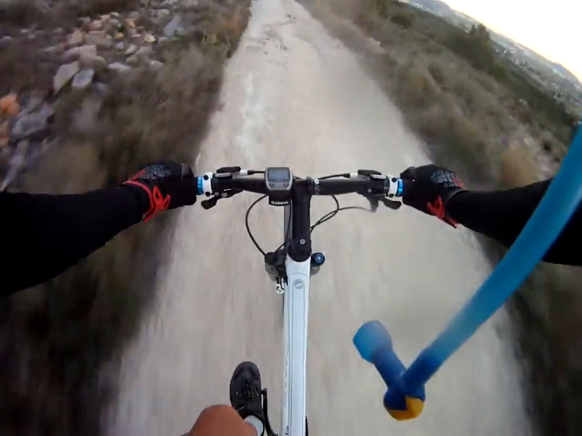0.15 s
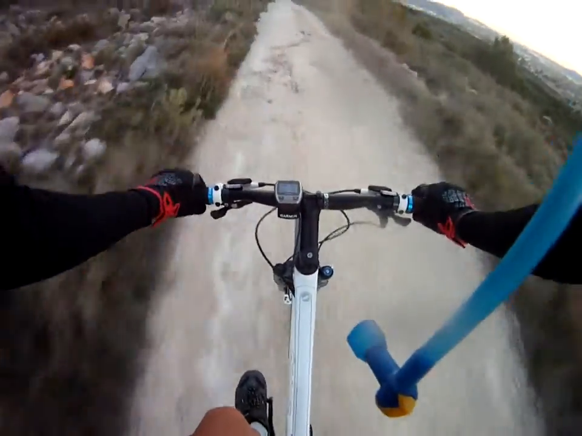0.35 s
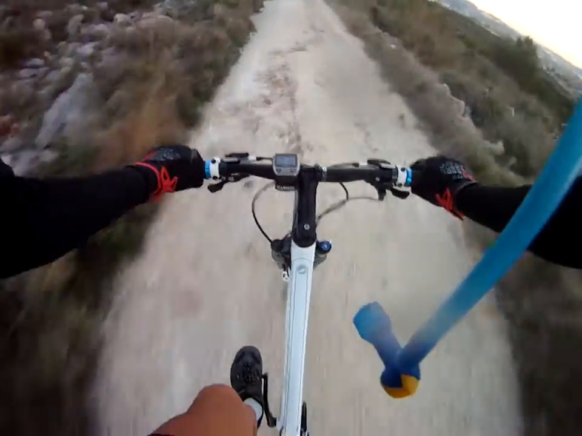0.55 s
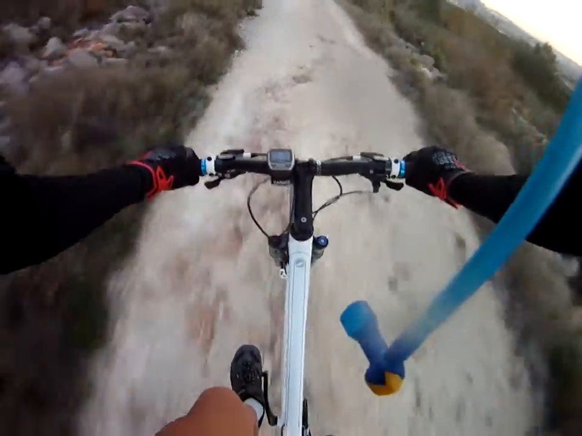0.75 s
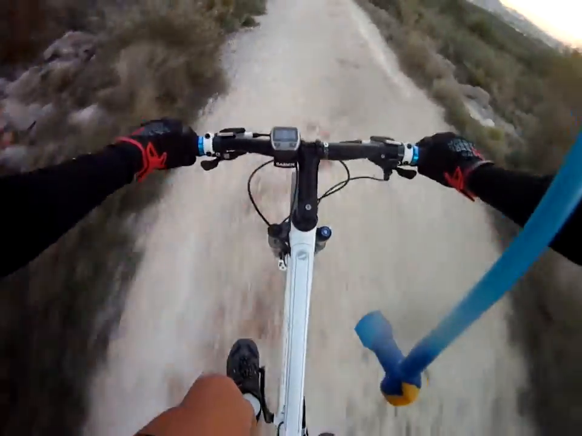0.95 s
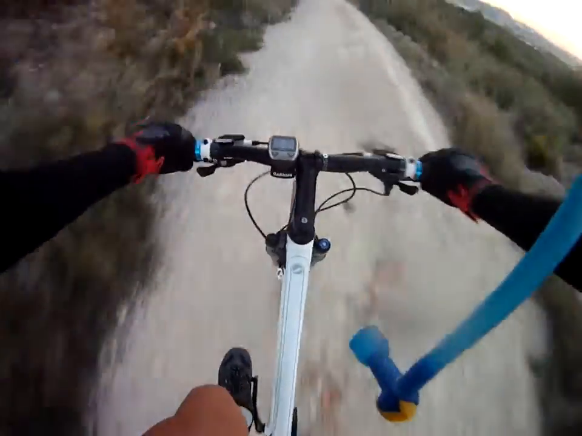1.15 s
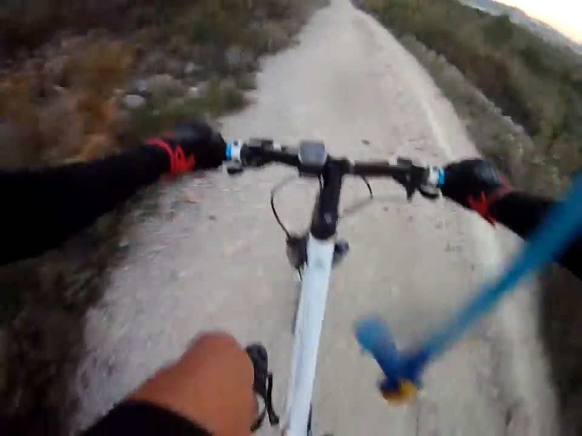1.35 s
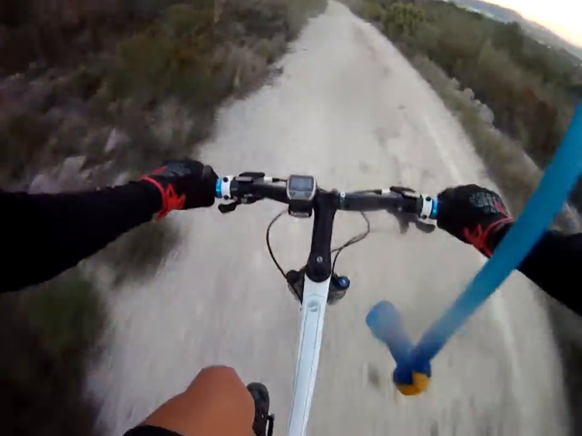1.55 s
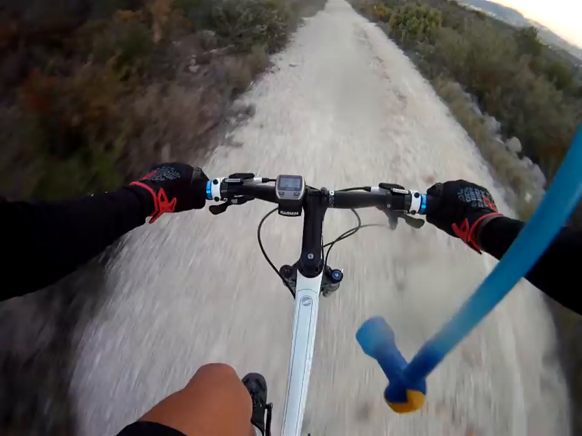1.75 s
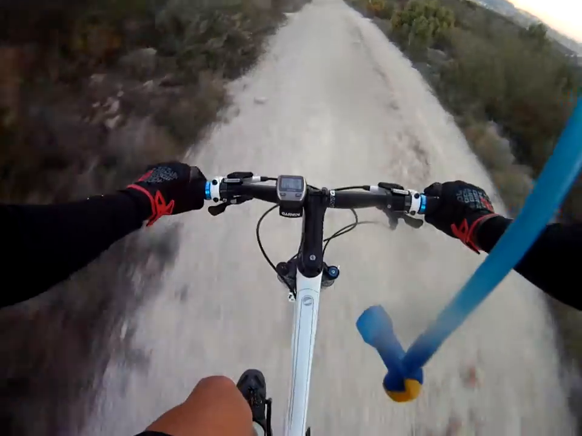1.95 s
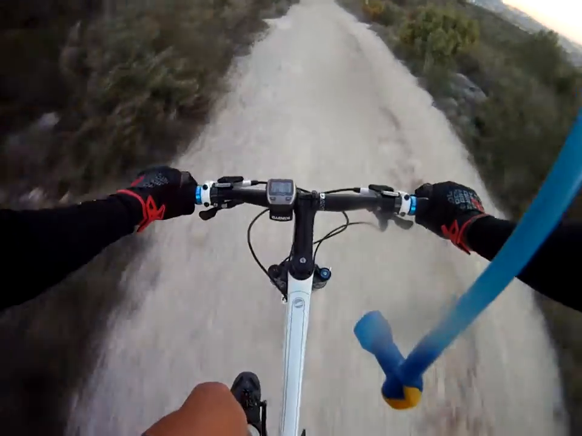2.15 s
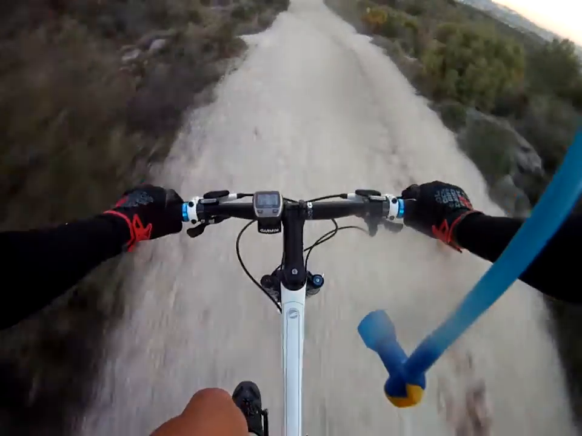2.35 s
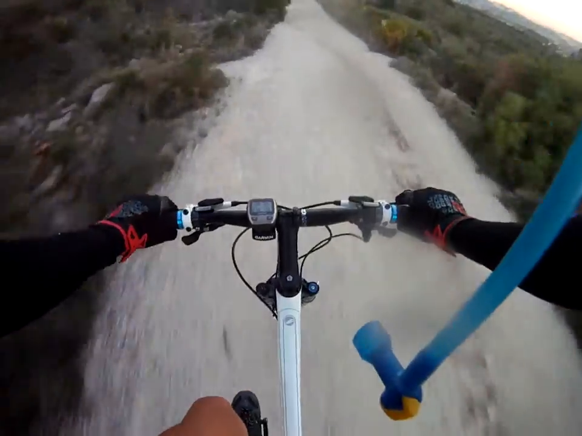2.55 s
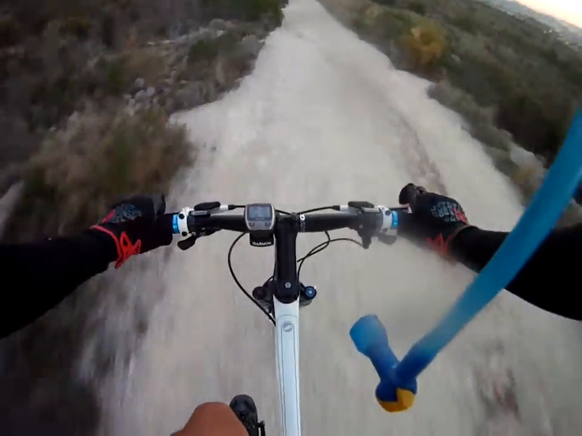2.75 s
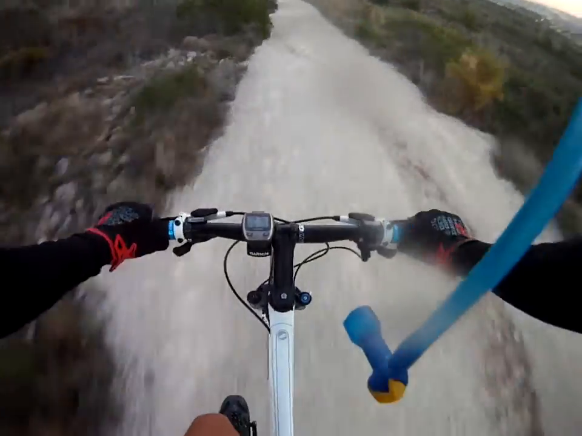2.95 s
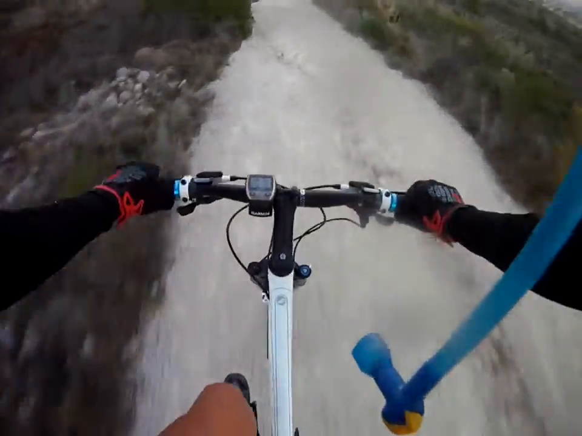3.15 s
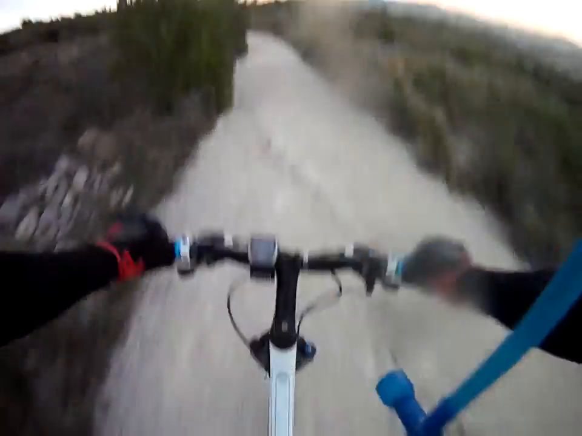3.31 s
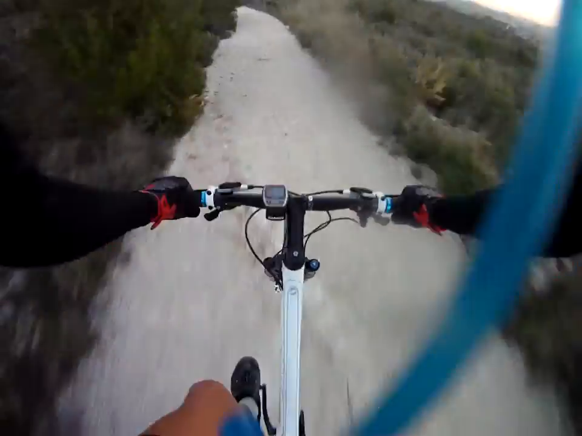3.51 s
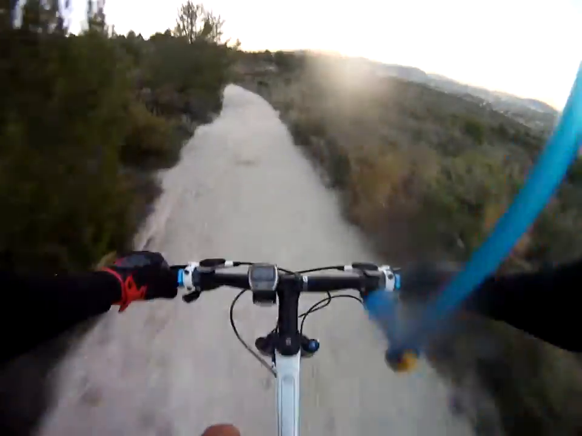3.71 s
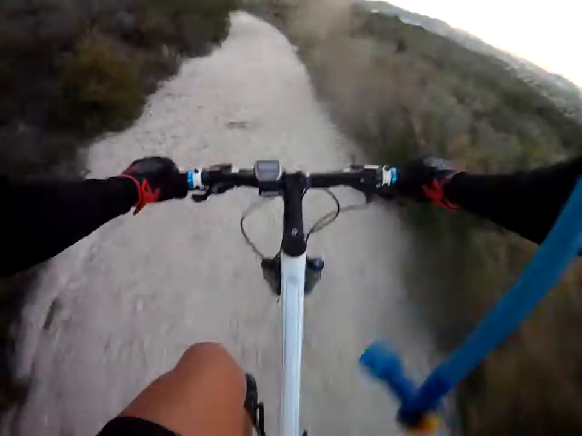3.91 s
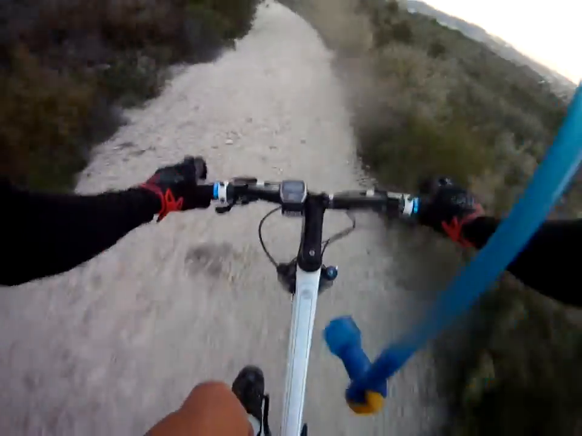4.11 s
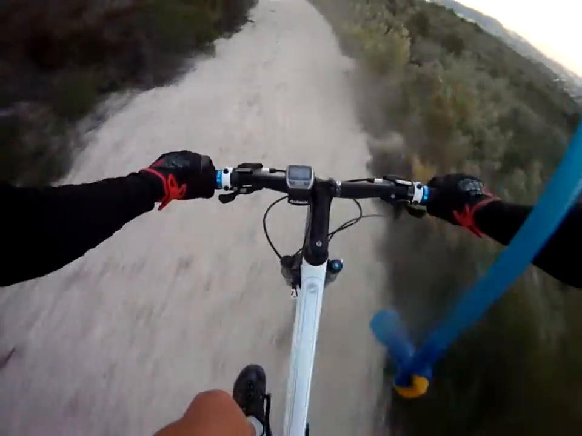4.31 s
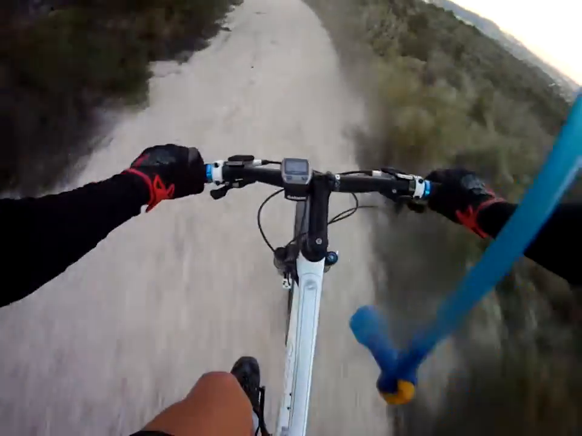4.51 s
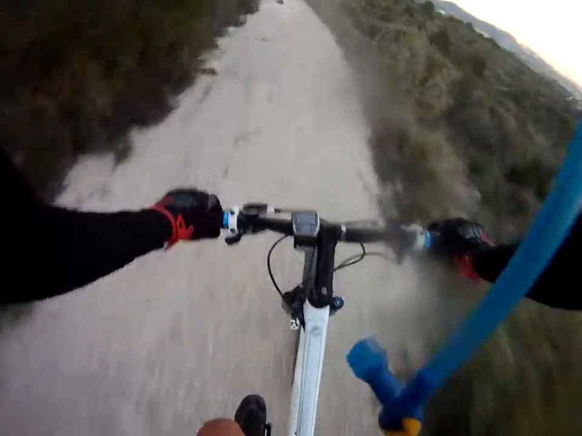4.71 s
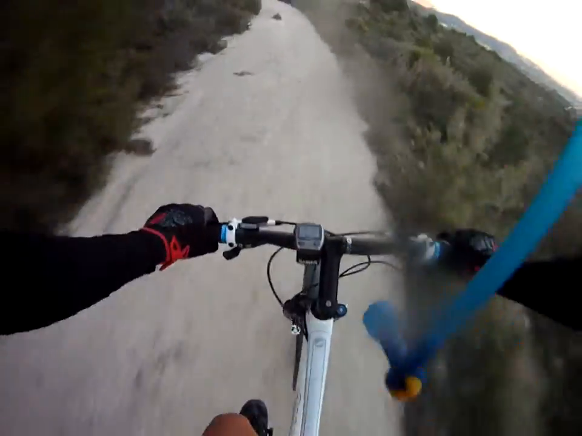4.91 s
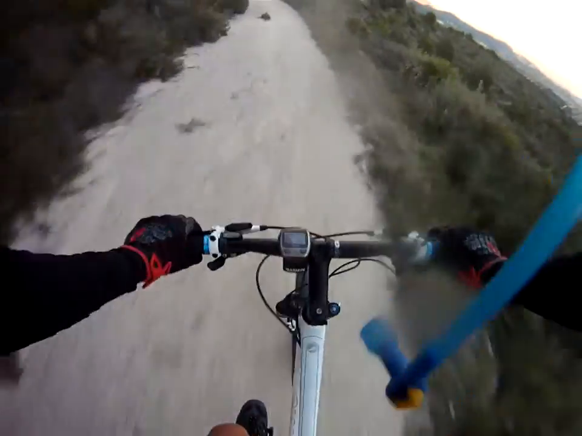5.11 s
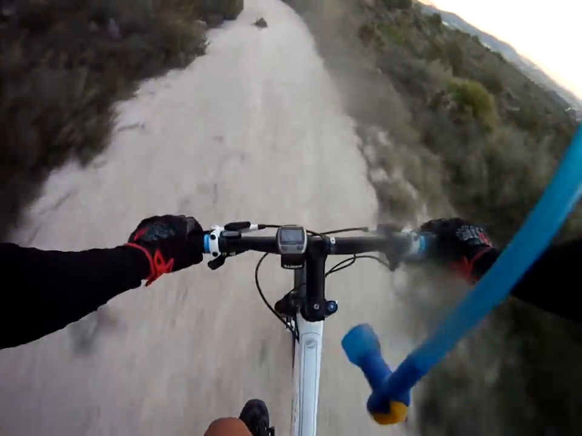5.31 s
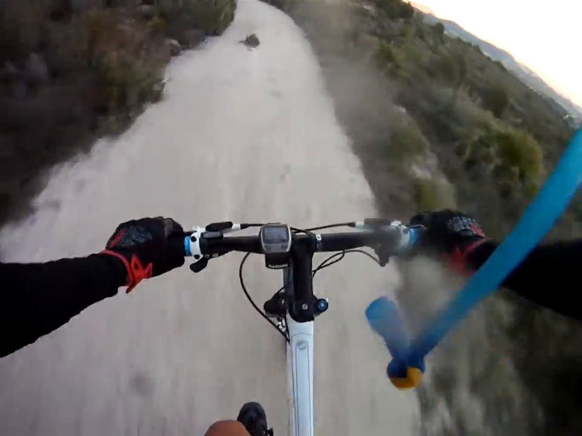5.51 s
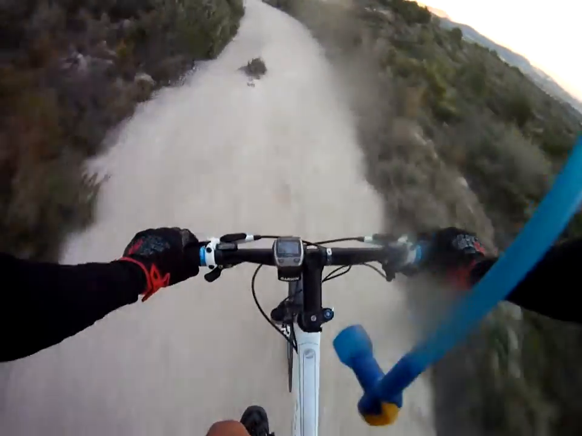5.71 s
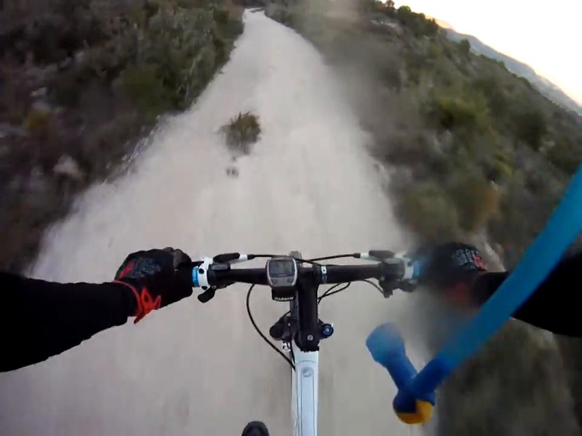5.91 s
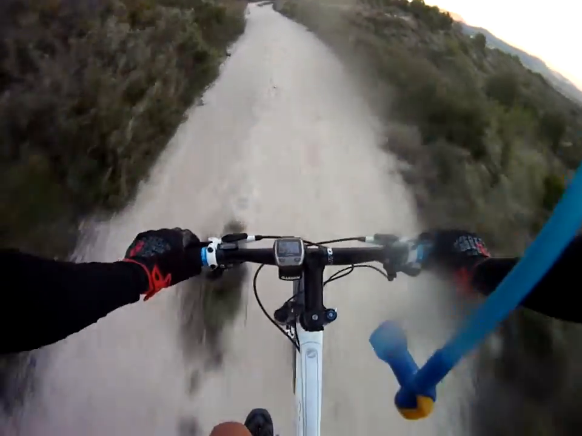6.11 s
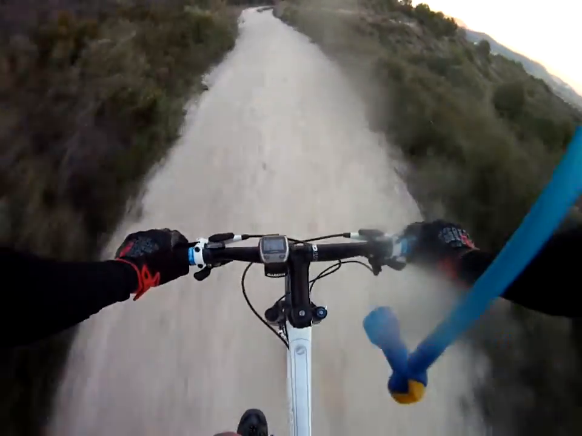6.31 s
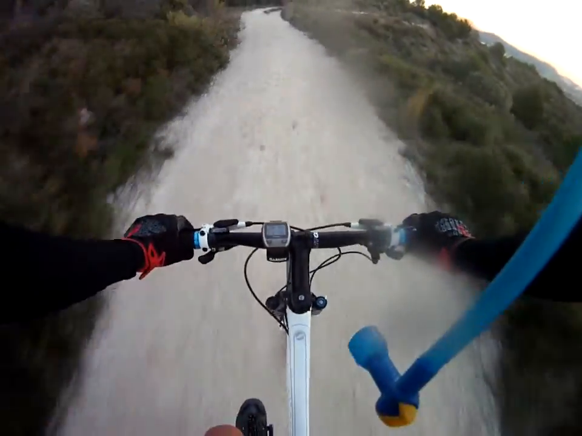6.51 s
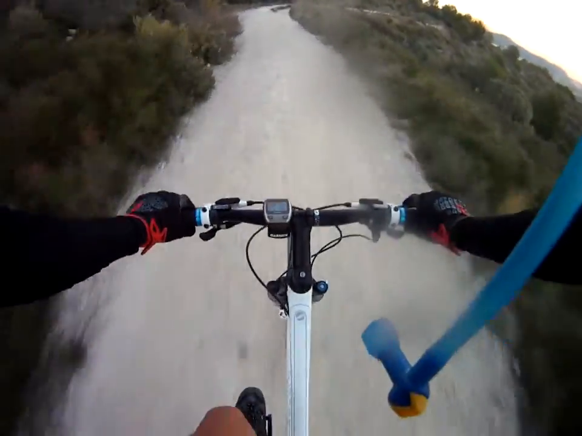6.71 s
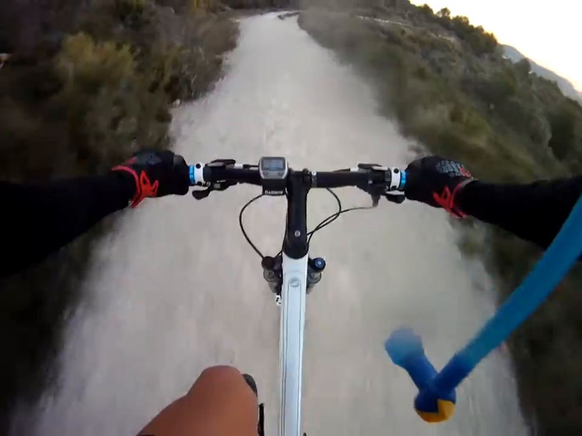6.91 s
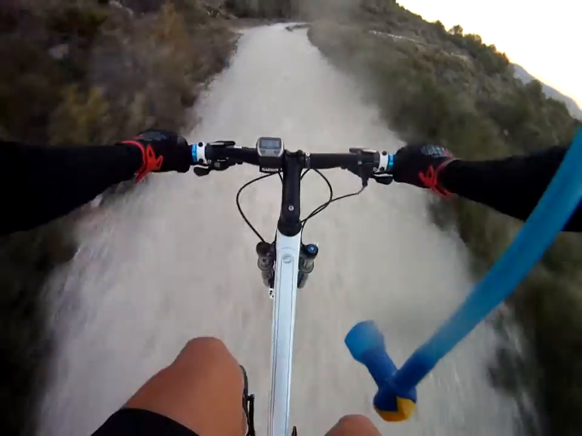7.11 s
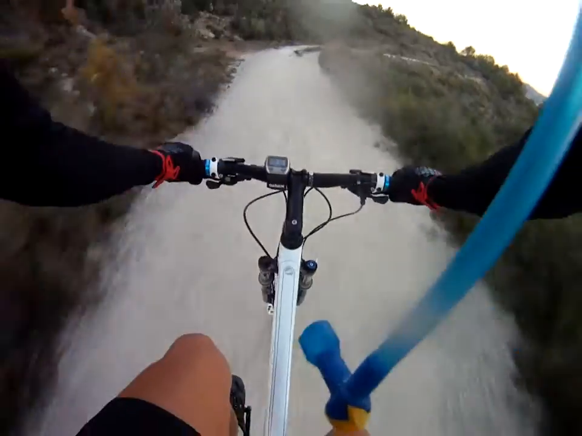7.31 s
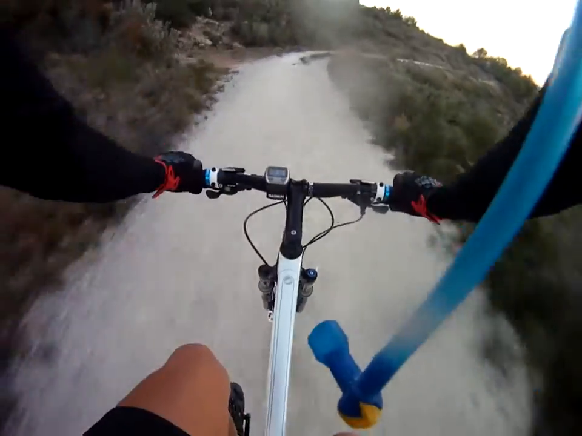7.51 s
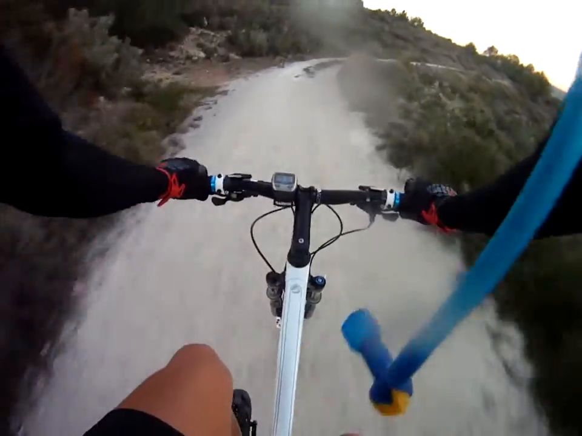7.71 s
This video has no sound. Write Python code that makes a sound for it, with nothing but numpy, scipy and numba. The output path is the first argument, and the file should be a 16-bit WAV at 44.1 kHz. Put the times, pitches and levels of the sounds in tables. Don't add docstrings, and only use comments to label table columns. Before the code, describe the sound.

Muffled wind buffeting and thin tyre crunch form a steady, fairly quiet bed outdoors, with straps rubbing over cloth and pebbles flicking the frame. Bumps make the camera housing slam and its latch clack: short, dry, boxy plastic hits, overloaded, in two rough flurries and a late single blow. The very close microphone sounds boxed-in, with harsh, grainy digital treble.

```python
import sys
import numpy as np
from scipy import signal
from scipy.fft import rfft, irfft, next_fast_len
from scipy.io import wavfile
from scipy.ndimage import uniform_filter1d, map_coordinates
from numba import njit

SR = 44100
rng = np.random.default_rng(int(sys.argv[2]) if len(sys.argv) > 2 else 0)


def volts_from_db(level):
    exponent = np.asarray(level, float) / 20
    return 10 ** exponent


def store_wav(level_fs):
    pcm = np.round(np.clip(np.atleast_2d(level_fs), -1, 1) * 32767)
    wavfile.write(sys.argv[1], SR, pcm.T.astype(np.int16))


N = 342216

# start [s], shell level [dB], latch level [dB], shell pitch [Hz].
SHELL_KNOCKS = [(0.706, -9.5, -39, 1370), (1.0019, -1, -37.5, 1385), (1.1029, -14, -36, 1290),
                (1.52, -10.5, -47, 1310), (1.6093, -18.5, -38, 1350), (3.432, -4.5, -36, 1350),
                (3.4515, 2.5, -23.5, 1480), (3.456, -10, -46, 1340), (3.9129, 2, -28, 1330),
                (3.9713, -2.5, -24.5, 1390), (4.0148, -0.5, -22.5, 1340), (4.029, -8.5, -29.5, 1250),
                (4.118, -10, -34.5, 1190), (4.1308, -10, -35, 1330), (4.153, -0.5, -29, 1410),
                (4.3829, -1.5, -26.5, 1390), (4.558, -10.5, -53, 1360), (4.6843, 5.5, -21, 1430),
                (4.8184, 1.5, -25, 1394), (5.654, -14, -38, 1310), (6.0555, -10.5, -30.5, 1310),
                (6.3621, -21.5, -41.5, 1280), (6.9217, -13.5, -30, 1315)]
# start [s], shell level [dB], latch level [dB], shell pitch [Hz],
# latch pitch [Hz].
LATCH_CLACKS = [(0.273, -21.5, -22.5, 1360, 3200), (1.058, -27, -22.5, 1550, 3050),
                (1.3784, 3.5, 0, 1410, 3410), (1.4232, 3, -7, 1390, 3190), (3.3954, -11, -6, 1370, 3270),
                (3.436, -18, -14.5, 1280, 3170), (3.7863, 8.5, -9.5, 1330, 2960),
                (3.9287, 1.5, -15, 1270, 3520), (3.961, 7, -11, 1380, 3200), (4.9497, -37, -17, 1280, 3150),
                (5.0503, -23, -21.5, 1330, 3150)]
USUAL_LATCH_HZ = 3200


def unit(x):
    return x / np.sqrt(np.mean(x ** 2) + 1e-20)


def along(points, hz):
    f, v = np.transpose(points)
    return np.interp(np.log(hz + 1), np.log(f + 1), v)


def curves(rows):
    s, *columns = np.transpose(rows)
    return [np.interp(np.arange(N) / SR, s, column) for column in columns]


def wobble(rate):
    coarse = np.arange(0, N + 32, 32)
    knots = rng.standard_normal(int(N * rate / SR) + 4)
    return np.interp(np.arange(N), coarse, map_coordinates(knots, [coarse * rate / SR]))


def filtered(x, response):
    m = next_fast_len(N + SR // 2)
    return irfft(rfft(x, m) * response(np.fft.rfftfreq(m, 1 / SR)), m)[..., :N]


def ring(t, hz, db, t60):
    return volts_from_db(db - 60 * t / t60) * np.sin(2 * np.pi * hz * t)


def dull(shell_db, hz):
    return 0.6 * min(shell_db - 6, 0) * max(np.log2(hz / 2300), 0)


def case_blows(rows, extra_db):
    # pitch [Hz], level [dB], decay t60 [s].
    shell_modes = [(428, -11, 0.016), (984, -19, 0.032), (1680, -5, 0.016), (2250, -7.5, 0.013),
                   (4160, -18, 0.016)]
    # pitch [Hz], level [dB], decay t60 [s].
    latch_modes = [(2800, -14, 0.01), (3110, -8, 0.008), (3490, -13.5, 0.03), (4220, -17.5, 0.022),
                   (4450, -42, 0.013)]
    out = np.zeros(N + SR)
    t = np.arange(SR // 20) / SR
    for s, shell_db, latch_db, shell_hz, latch_hz, contact_ms in rows:
        contact = max(contact_ms, 0.1) / 1000
        drive = (1 - np.exp(-t / 0.0004)) * volts_from_db(-60 * np.maximum(t - contact, 0) / 0.012)
        main = -drive * np.sin(2 * np.pi * shell_hz * t)
        main += ring(t, 0.967 * shell_hz, -16.5, 0.018)

        shell = np.zeros(len(t))
        for hz, db, t60 in shell_modes:
            level, pitch = rng.standard_normal(2)
            shell += ring(t, hz * (1 + 0.023 * pitch), db + 2.1 * level + dull(shell_db, hz), t60)
        latch = ring(t, latch_hz, 0.86, 0.0086) + ring(t, 2450, -1.7, 0.0035)
        for hz, db, t60 in latch_modes:
            level, pitch = rng.standard_normal(2)
            latch += ring(t, hz * (1 + 0.011 * pitch), db + 3 * level, t60)

        chatter = 0.08 * rng.standard_normal(len(t)) * np.exp(-t / (contact + 0.0008))
        chatter[0] = -1
        modes = volts_from_db(shell_db - 6) * shell + volts_from_db(latch_db + 4.5) * latch
        rattle = signal.fftconvolve(modes, chatter)[:len(t)]
        out[round(s * SR):][:len(t)] += volts_from_db(extra_db) * (volts_from_db(shell_db - 2.5) * main + rattle)
    return filtered(out[:N], lambda hz: (-hz ** 2 / (720 ** 2 - hz ** 2 + 1j * hz * 800)) ** 2)


def timed(table, latch_hz):
    return [(*row[:-1], latch_hz, row[-1]) for row in table]


def slams():
    # start [s], shell level [dB], latch level [dB], shell pitch [Hz], contact time [ms].
    hardest = [
        (1.3337, -2.5, -5, 1598, 2.9),
        (1.4609, 13, -6, 1286, 1.7),
        (1.466, 2, -21, 1535, 0.64),
        (3.5599, 2.5, -17, 1316, 1.9),
        (3.7595, 9.5, -8.5, 1321, 1.2),
        (3.9053, -5.5, -10, 1350, 3.8),
        (7.6294, 3.5, -10, 1330, 1.74),
        (7.6296, -10.5, -23.5, 2256, 3.3),
        (7.6298, -6, -42, 392, 3.5),
    ]
    return case_blows(timed(hardest, 3325), extra_db=10.5)


def knocks():
    # start [s], shell level [dB], latch level [dB].
    taps = [(0.0146, -26.5, -60), (0.3502, -33, -40), (0.42, -30.5, -62), (1.319, -26, -31),
            (0.527, -32, -48), (0.894, -33, -53), (1.6725, -32, -48), (1.8084, -28, -45),
            (2.1954, -32, -46), (2.4628, -48.5, -45.5), (2.601, -25, -46), (2.9366, -49, -44),
            (3.2648, -24.5, -49.5), (3.464, -27, -28), (4.0587, -26, -47), (4.188, -41, -41),
            (4.5014, -31, -44), (4.7361, -34, -40), (4.8535, -30, -37), (4.9931, -23.5, -54),
            (5.083, -25, -59), (5.5366, -25, -45), (5.5518, -23, -46), (5.8277, -44, -52),
            (5.9244, -29, -63), (5.973, -24.5, -42), (6.545, -25.5, -59), (7.329, -24, -36),
            (7.3923, -38.5, -46), (7.6829, -27, -44)]
    # start [s], shell level [dB], latch level [dB], shell
    # pitch [Hz], contact time [ms].
    creaks_and_ticks = [
        (7.311, -33, -62, 790, 7),
        (7.335, -30, -60, 1400, 9),
        (5.538, -34, -60, 850, 6),
        (1.288, -27, -40, 1500, 1),
        (1.295, -25, -40, 1250, 3),
        (1.440, -18, -36, 1350, 4),
        (4.922, -27, -50, 1390, 1),
        (5.042, -27, -48, 1280, 1),
    ]
    rows = [(*row, USUAL_LATCH_HZ) for row in SHELL_KNOCKS] + LATCH_CLACKS
    rows += [(*row, 1350, USUAL_LATCH_HZ) for row in taps]
    rows = [(*row, 1 + 0.05 * (row[2] - row[1])) for row in rows]
    return case_blows(rows + timed(creaks_and_ticks, USUAL_LATCH_HZ), extra_db=1.42)


def jolts(column):
    # start [s], length
    # [ms], rub level [dB], crunch level [dB].
    strokes = [(7.431, 65, -49, -49), (7.136, 74, -44, -42), (0.299, 24, -45, -44), (6.46, 30, -49, -48),
               (0.738, 44, -44, -36.5), (1.038, 33, -42, -37), (1.229, 67, -38.5, -34.5),
               (1.269, 20, -33, -50.5), (1.31, 50, -46, -27.5), (1.373, 60, -32, -27),
               (1.539, 130, -49, -39), (1.84, 54, -44, -38), (2.335, 39, -46, -43), (3.129, 45, -40.5, -34),
               (3.335, 33, -46, -28.5), (3.395, 79, -31, -23), (3.49, 70, -40, -33),
               (3.606, 85, -33.5, -27.5), (3.732, 120, -41, -35.5), (3.875, 118, -35, -26),
               (4.169, 93, -44, -37.5), (4.73, 40, -42, -33.5), (4.89, 65, -42, -36), (5.37, 58, -48, -48),
               (5.519, 85, -46, -38.5), (5.974, 99, -44.5, -39), (6.713, 13, -44.5, -40),
               (7.28, 71, -46, -39), (7.315, 34, -38, -47), (7.527, 35, -41, -45),
               (1.243, 44, -35.5, -30.5),
        (1.313, 19, -44, -35),
        (1.404, 24, -36, -18),
        (1.440, 14, -40, -41),
        (1.453, 12, -12, -10),
        (3.866, 25, -27, -23),
        (3.949, 20, -30, -17),
        (3.335, 20, -44, -41),
    ]
    rows = strokes
    for s, shell_db, latch_db, *_ in SHELL_KNOCKS + LATCH_CLACKS:
        spray_db = -41 + 0.64 * max(shell_db, latch_db)
        rows.append((s, 30, spray_db - 9.5, spray_db))
    power = np.zeros(N)
    for row in rows:
        power[round(row[0] * SR):][:round(row[1] * SR / 1000)] += volts_from_db(2 * row[column])
    return np.sqrt(np.abs(uniform_filter1d(power, SR // 100)))


def case_response(hz):
    # centre [Hz], width [Hz], level [dB].
    resonances = [(1330, 270, -1), (1863, 470, 1), (2378, 502, 2.5), (2610, 303, 3), (3150, 420, -4)]
    total = 0
    for k, (centre, width, db) in enumerate(resonances):
        band = 1j * hz * width / (centre * centre - hz * hz + 1j * hz * width)
        total = total + (-1) ** k * volts_from_db(db) * band
    return total


def gravel():
    # time [s], looseness of the gravel [dB], strap drag over it [dB].
    ground = [(0.0, -50, 0.5), (0.65, -45.5, -8), (0.84, -51, -8), (1.02, -53, -3), (1.42, -42, 1),
              (2.01, -49.5, -6), (3.41, -45, -5.5), (3.54, -37.5, -1), (3.69, -45, -18), (4.04, -40, -5),
              (4.21, -45, -12), (4.43, -45.5, -5), (4.86, -43.5, -4), (5.03, -46.5, -6), (6.57, -51, -7.5),
              (7.2, -46, -2), (7.54, -52, 1), (7.76, -46, -7)]
    # frequency [Hz], level [dB per Hz].
    rub_colour = [(500, -16), (1000, -35), (2000, -22.5), (3500, -1), (4500, 1), (5400, -4), (5900, -0.5)]
    crunch_db, drag_db = curves(ground)
    rub_db = crunch_db + drag_db

    cracks = rng.standard_normal(N) * (rng.random(N) < 2500 / SR)
    cracks *= volts_from_db(1.7 * rng.exponential(size=N))
    _, _, z = signal.stft(unit(cracks) + 1.2 * rng.standard_normal(N), nperseg=256)
    patches = uniform_filter1d(rng.standard_normal(z.shape), size=3, axis=0)
    patches = uniform_filter1d(patches, size=3, axis=1)
    bed = signal.istft(z * volts_from_db(1.2 * unit(patches)), nperseg=256)[1][:N]
    clumps = wobble(50)
    crunch = unit(volts_from_db(2.14 * clumps + 2.0 * wobble(120)) * filtered(bed, case_response))

    cloth = filtered(rng.standard_normal(N), lambda hz: volts_from_db(along(rub_colour, hz)))
    rub = unit(volts_from_db(1.2 * clumps + 2.8 * wobble(22) + 2.5 * wobble(150)) * cloth)

    crunch_gain = np.hypot(volts_from_db(crunch_db + 1.3), volts_from_db(-5.5) * jolts(column=3))
    rub_gain = np.hypot(volts_from_db(rub_db + 2), volts_from_db(3.5) * jolts(column=2))
    return crunch_gain * crunch + rub_gain * rub


def pebbles():
    # start [s], peak level [dB], pitch [Hz].
    big_stones = [(0.3486, -22.5, 2270), (0.4574, -28, 1920), (0.5267, -27, 1880), (0.7417, -29, 3540),
                  (0.7721, -29, 2110), (0.8922, -29, 1870), (1.6262, -24, 1300), (1.8437, -26, 2750),
                  (2.4628, -29, 2180), (4.0587, -29, 1580), (5.1218, -34, 2530), (5.686, -28, 2320),
                  (5.7563, -36, 2230), (5.8272, -26, 2310), (5.8594, -40, 2230), (5.9494, -29, 1320),
                  (6.754, -32, 2300), (6.9661, -28, 2910), (7.0179, -29, 2300), (7.0993, -34, 1900),
                  (7.1794, -35, 1640), (7.2609, -33, 1310), (7.3594, -39, 2010), (7.3916, -29, 2700),
                  (7.4064, -39, 2250)]
    place, pitch, size = rng.random((round(90 * N / SR), 3)).T
    big_s, big_db, big_hz = np.transpose(big_stones)
    t = np.arange(SR // 100) / SR
    hz = np.append(1200 * volts_from_db(8.5 * pitch), big_hz)[:, None]
    db = np.append(-42 - 3.6 * np.log(size + 0.011), big_db + 8)[:, None]
    pings = ring(t, hz, db, 14 / hz) * (1 - np.exp(-t / 0.00064))
    at = np.append(place * N, big_s * SR).astype(int)[:, None] + np.arange(len(t))
    return np.bincount(at.ravel(), pings.ravel(), N + len(t))[:N]


def wind():
    # time [s], wind strength [dB], large eddies over small [dB].
    ride = [(0.0, -37, -6.5), (0.34, -38, 2.5), (0.54, -37, -7.5), (0.88, -36, -2.5), (1.42, -37.5, -4.5),
            (3.18, -33.5, -3.5), (3.74, -38.5, -7), (3.98, -35.5, 1.5), (4.13, -33, -5), (5.3, -34.5, -5),
            (5.68, -34.5, -4.5), (5.94, -34, -2.5), (6.16, -36, -5), (6.35, -36.5, -9), (6.7, -36, 1),
            (7.02, -37, -3), (7.39, -39, 2), (7.76, -37, -1)]
    # frequency [Hz], level [dB per Hz].
    buffet = [(8.8, -38), (15, -1), (37, 1.5), (133, -6.5), (202, -13.5), (258, -17), (454, -28.5),
              (679, -38.5), (869, -40), (1000, -43.5), (1300, -96), (2200, -120)]
    fast_db, large_db = curves(ride)
    slow_db = fast_db + large_db

    def low(hz):
        return 1 / (1 + (hz / 75) ** 4)

    slow = filtered(rng.standard_normal(N), lambda hz: volts_from_db(along(buffet, hz)) * np.sqrt(low(hz)))
    fast = filtered(rng.standard_normal(N), lambda hz: volts_from_db(along(buffet, hz)) * np.sqrt(1 - low(hz)))
    lumpy = volts_from_db(0.29 * wobble(6.2) + 1.1 * wobble(30)) * fast
    return volts_from_db(slow_db + 4.0) * unit(slow) + volts_from_db(fast_db + 0.5) * unit(lumpy)


def scene():
    return (slams() + knocks() + gravel() + pebbles() + wind())[None]


@njit
def ducking(over_db, attack, hold, release):
    out, aim, now, wait = np.zeros(len(over_db)), 0., 0., 0.
    for i in range(len(over_db)):
        if over_db[i] > aim:
            aim, wait = over_db[i], hold
        elif wait > 0:
            wait -= 1
        else:
            aim *= 1 - release
        now += attack * (aim - now)
        out[i] = now
    return out


def roll_off(x):
    return signal.sosfilt(signal.butter(12, 16460, fs=SR, output="sos"), x)


def record(dry):
    hold_hz, top_hz = 12000, 15350
    over_db = 0.84 * (20 * np.log10(np.abs(dry[0]) + 1e-9) - 0.3)
    duck_db = ducking(over_db, 1 / (0.0046 * SR), 0.021 * SR, 1 / (0.024 * SR))
    x = np.clip(dry * volts_from_db(-duck_db), -1, 1)
    x = filtered(x, lambda hz: 1 / (1 + (hz / 5750) ** 40))
    x = x * (1 + 2 * np.cos(2 * np.pi * hold_hz * np.arange(N) / SR))

    def hold_and_limit(hz):
        step_db = -38 * np.clip((hz - top_hz) / 240 + 0.5, 0, 1)
        return np.sinc(hz / hold_hz) * volts_from_db(step_db) * (hz < 16460)

    x = filtered(x, hold_and_limit)
    return roll_off(np.clip(x, -1, 1))


dry = scene()
out = record(dry)
store_wav(out)
```